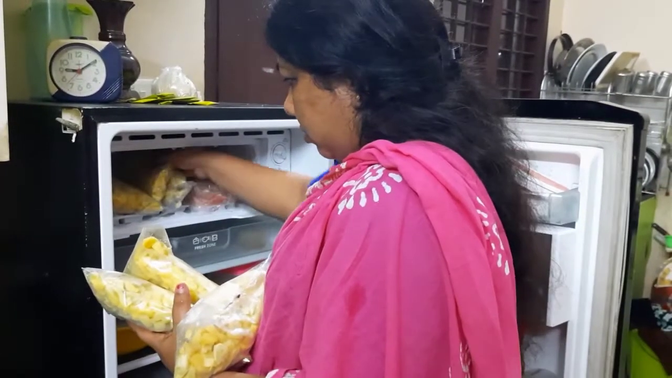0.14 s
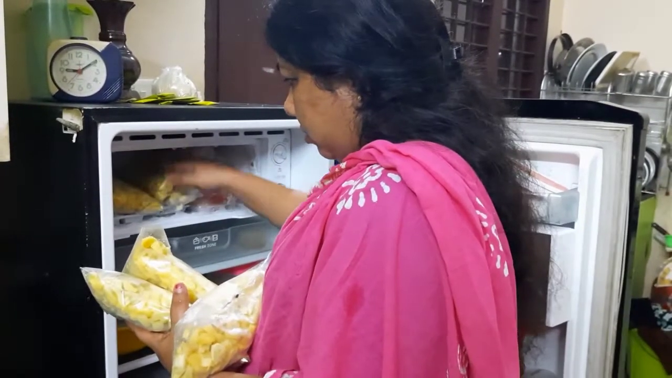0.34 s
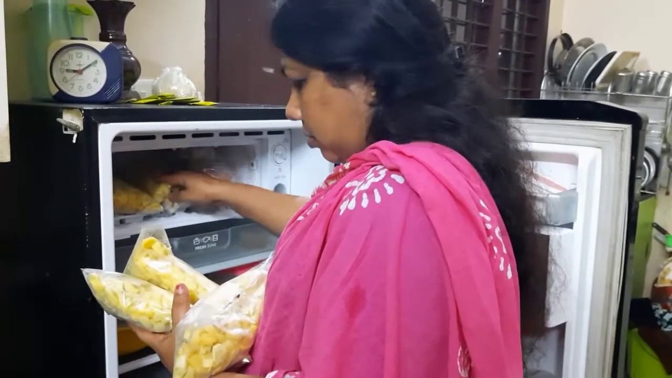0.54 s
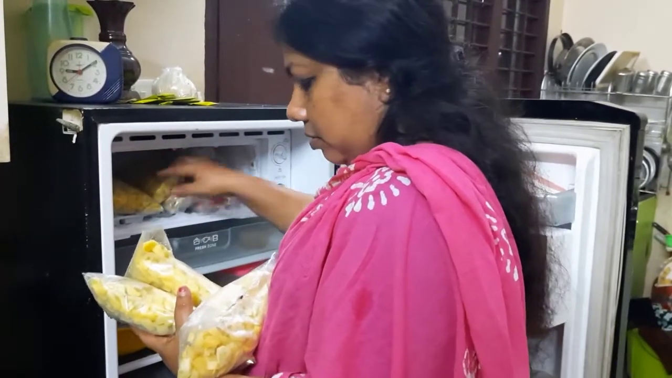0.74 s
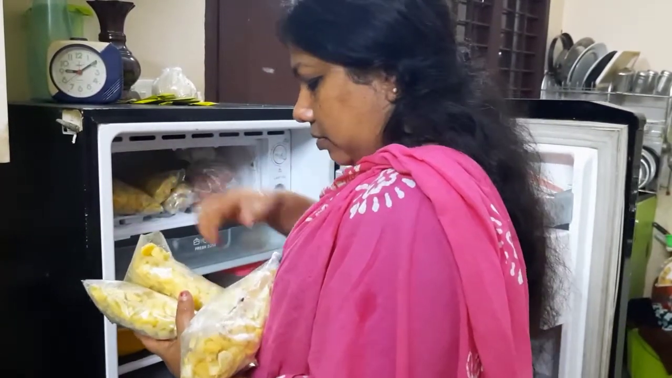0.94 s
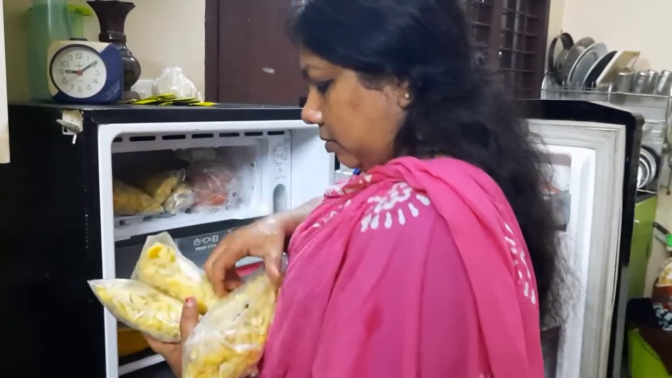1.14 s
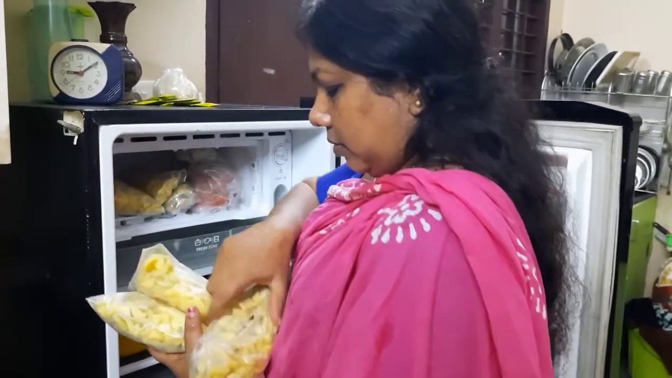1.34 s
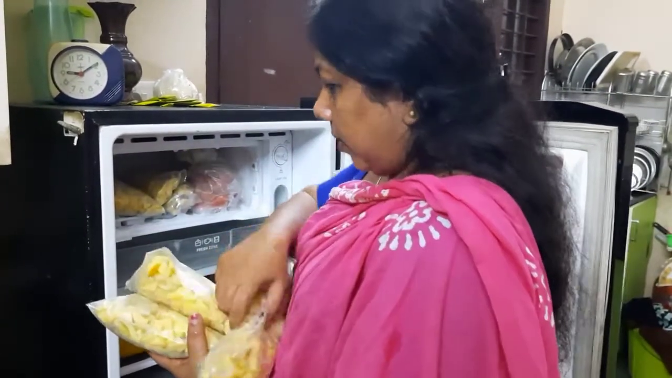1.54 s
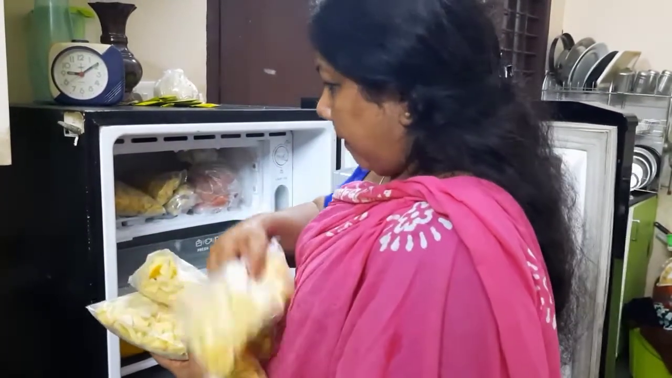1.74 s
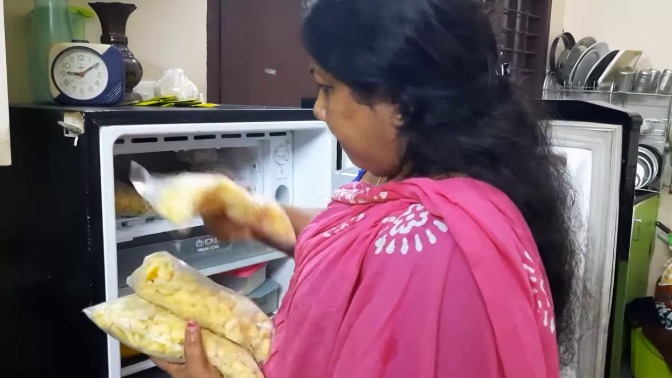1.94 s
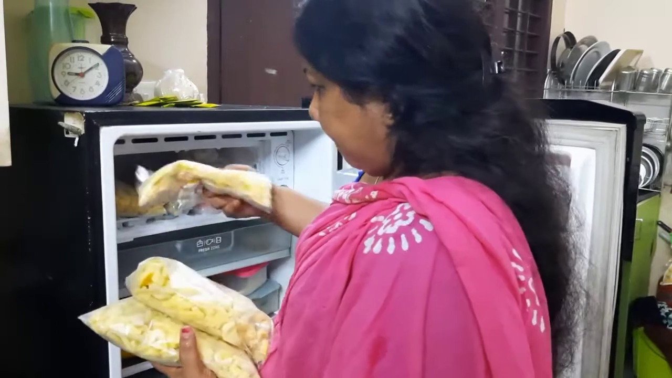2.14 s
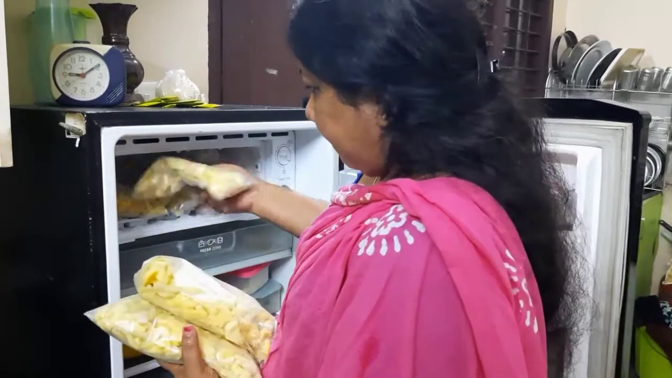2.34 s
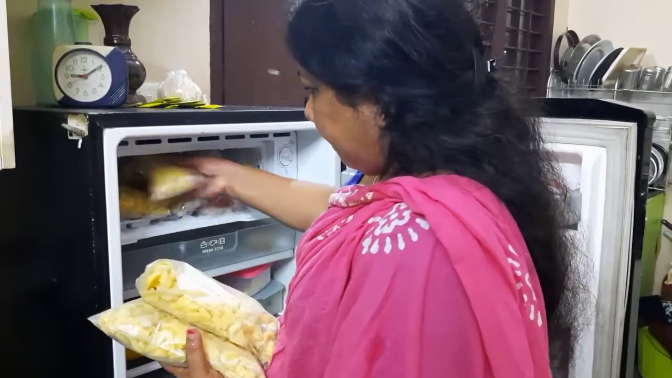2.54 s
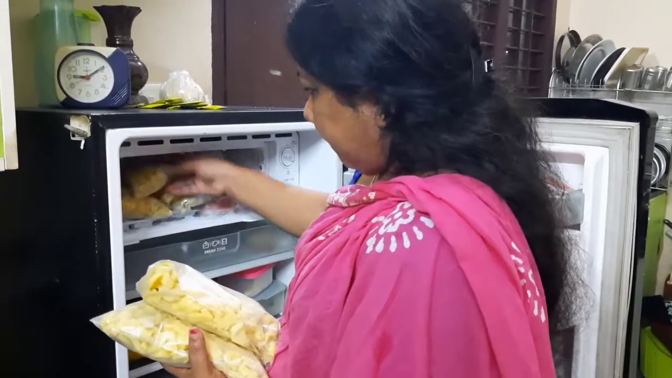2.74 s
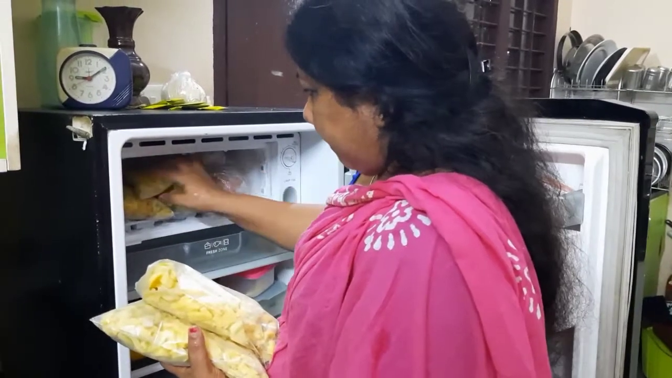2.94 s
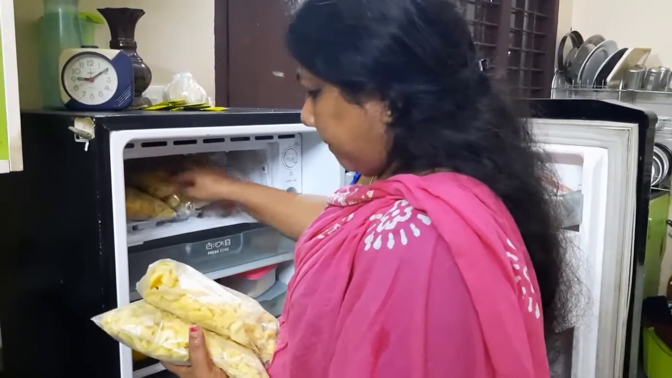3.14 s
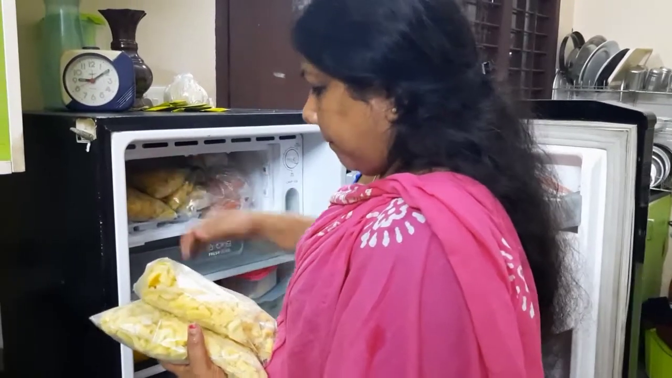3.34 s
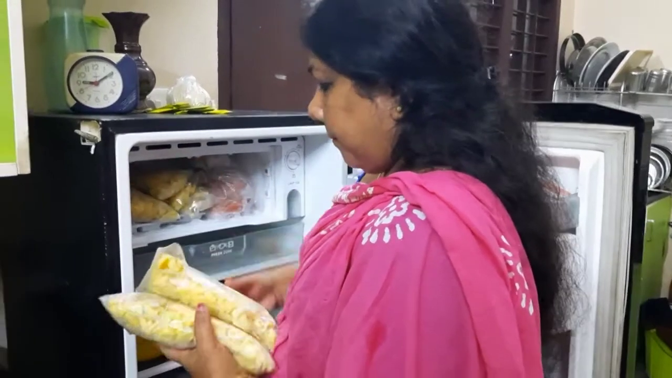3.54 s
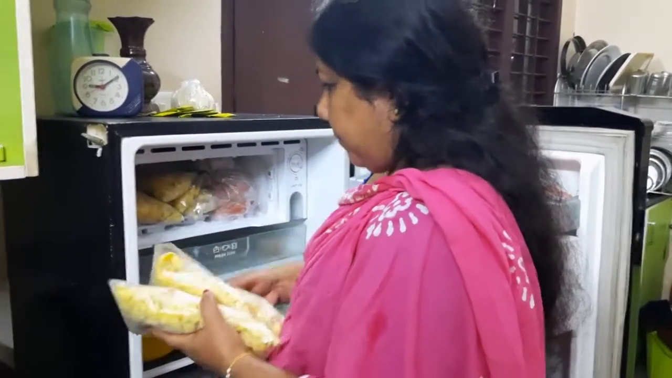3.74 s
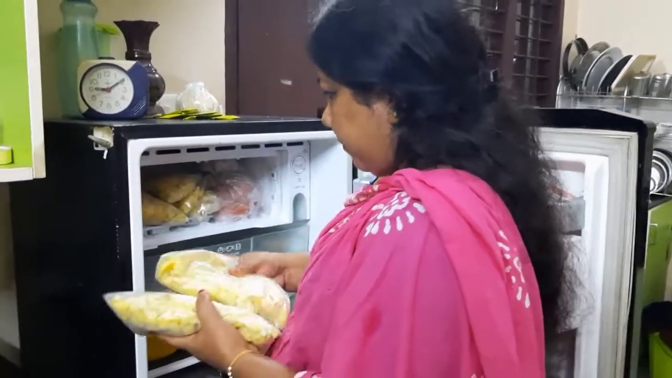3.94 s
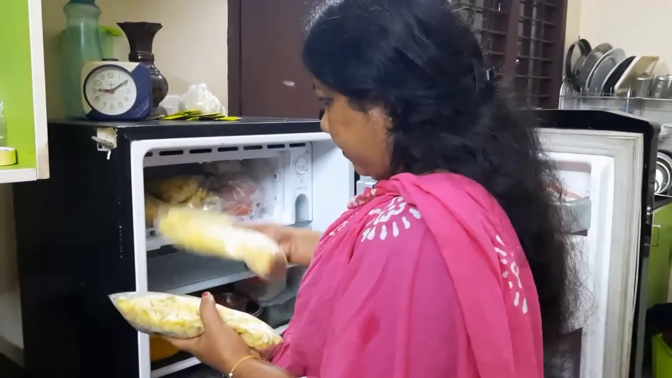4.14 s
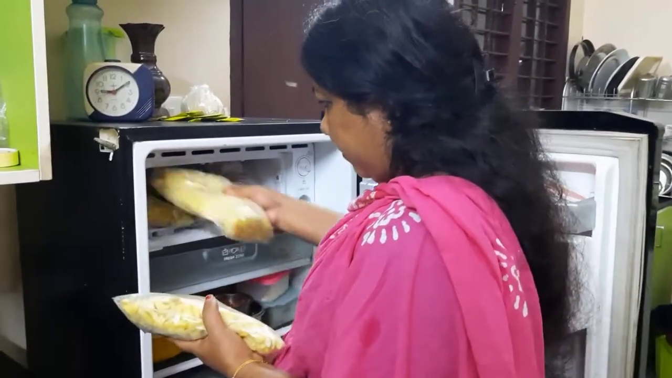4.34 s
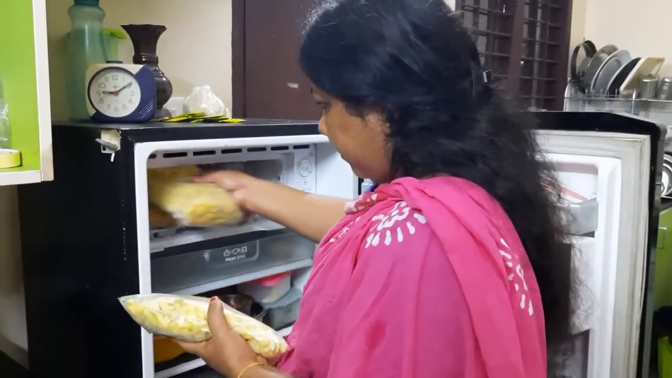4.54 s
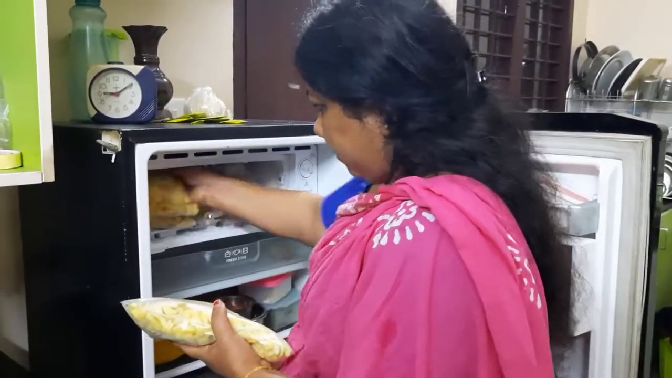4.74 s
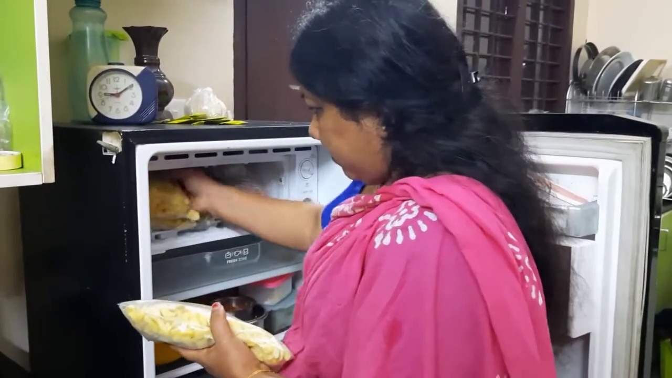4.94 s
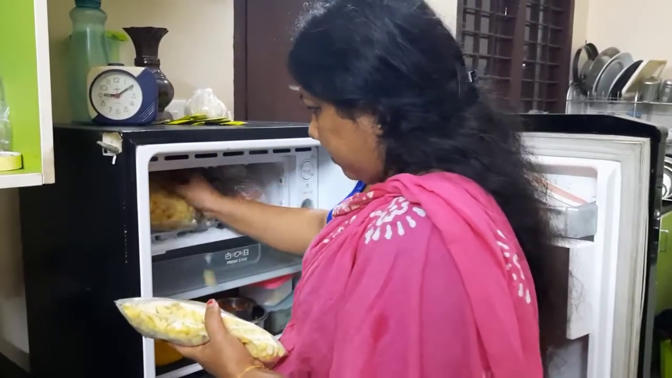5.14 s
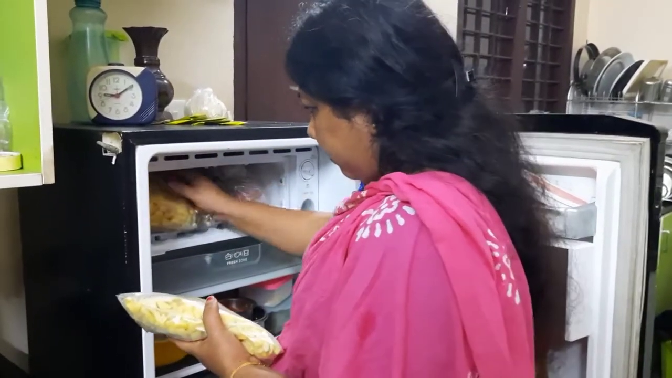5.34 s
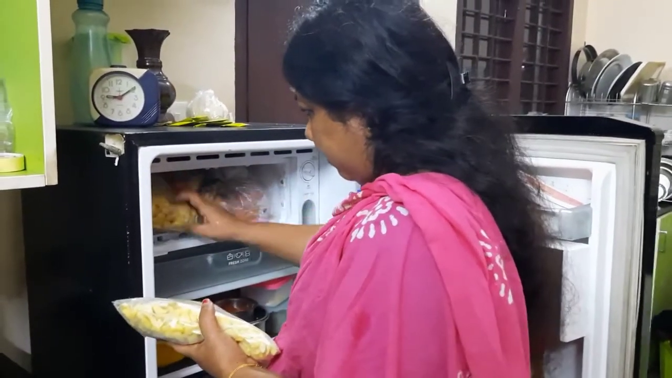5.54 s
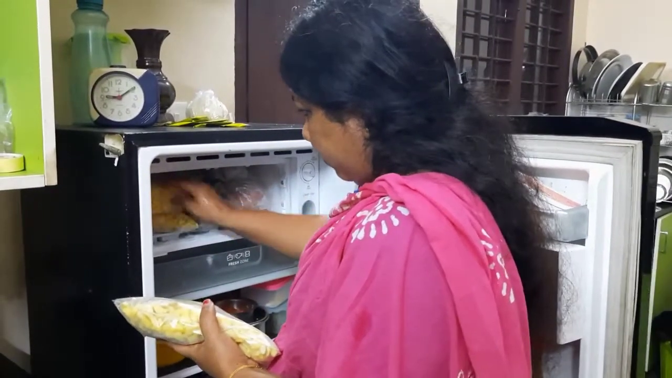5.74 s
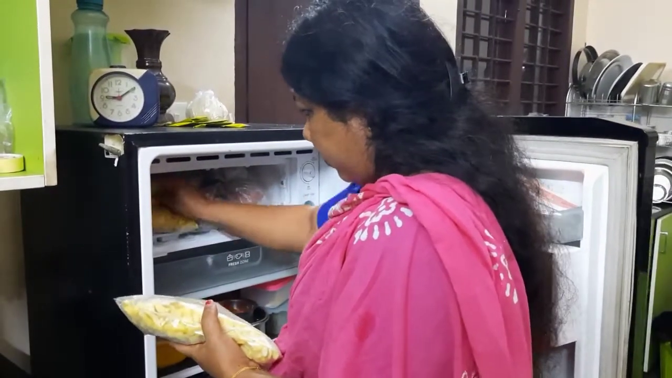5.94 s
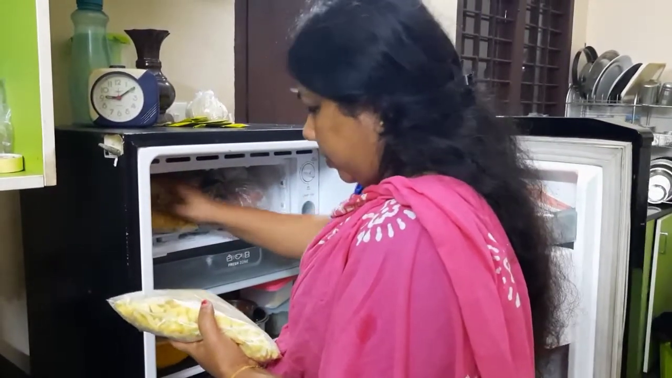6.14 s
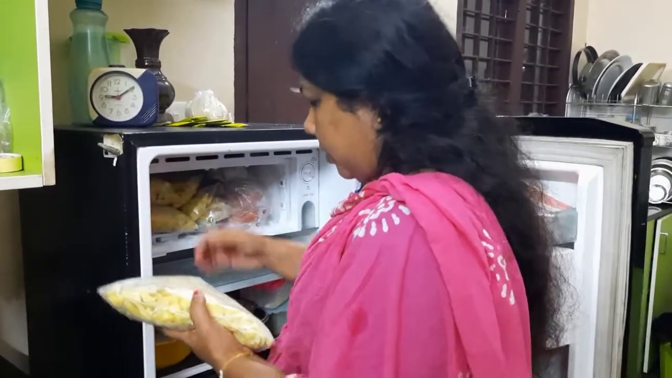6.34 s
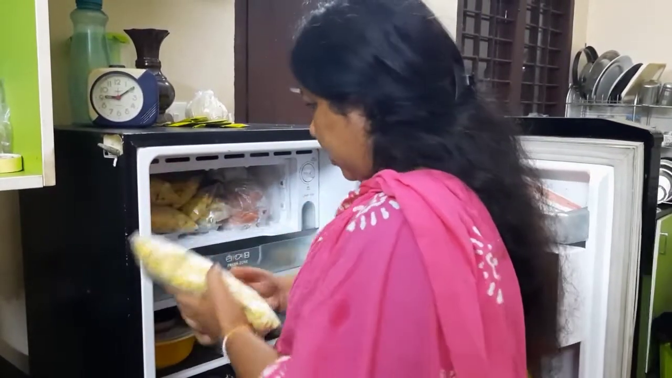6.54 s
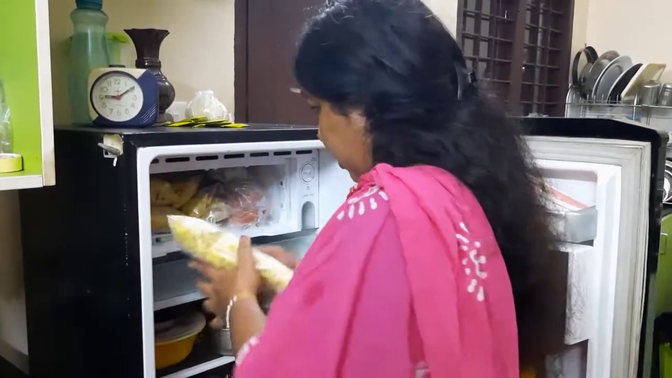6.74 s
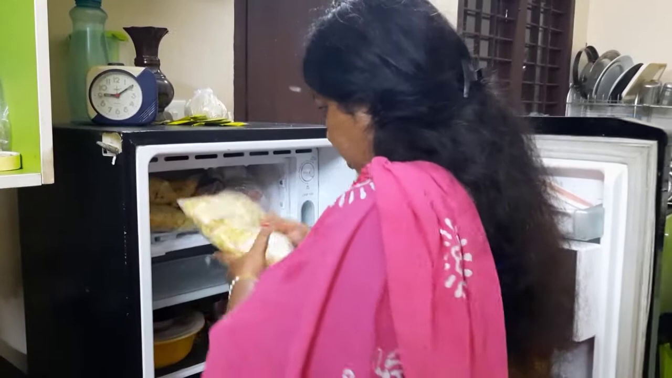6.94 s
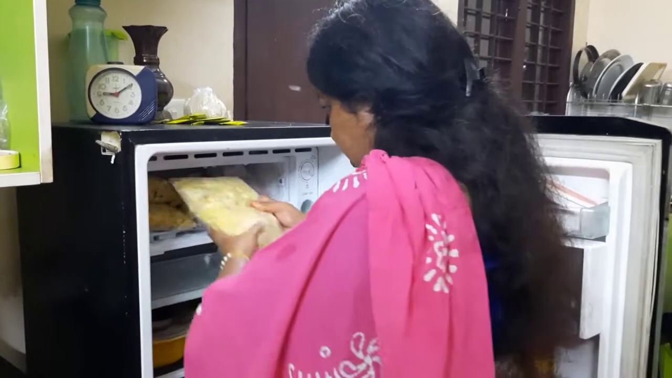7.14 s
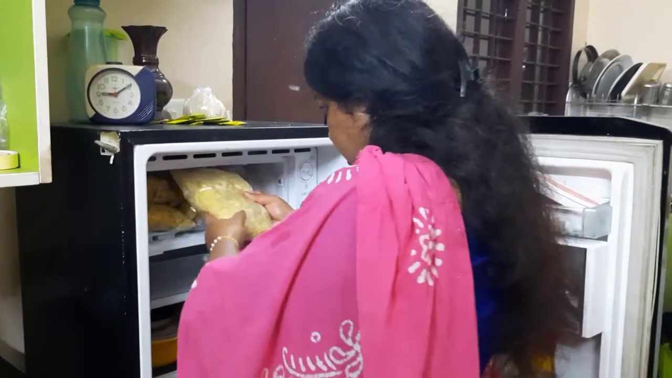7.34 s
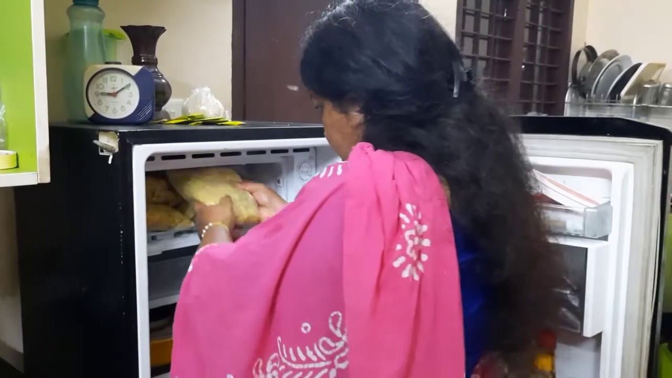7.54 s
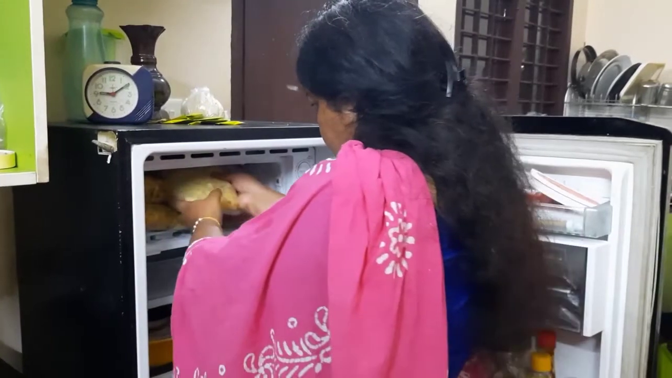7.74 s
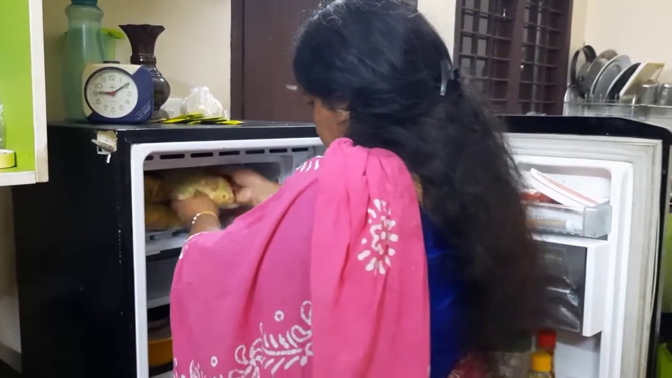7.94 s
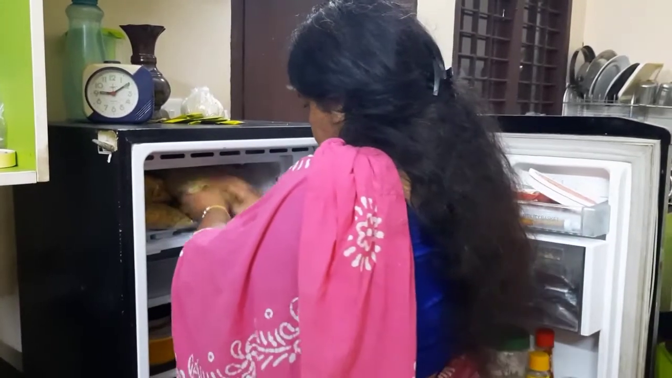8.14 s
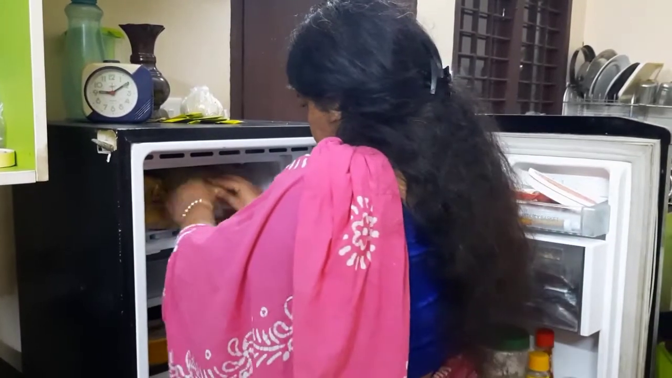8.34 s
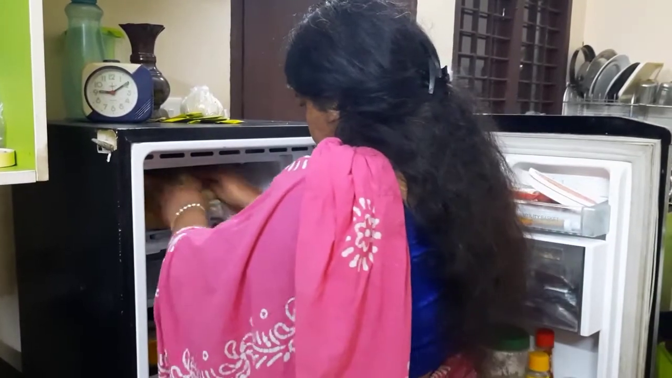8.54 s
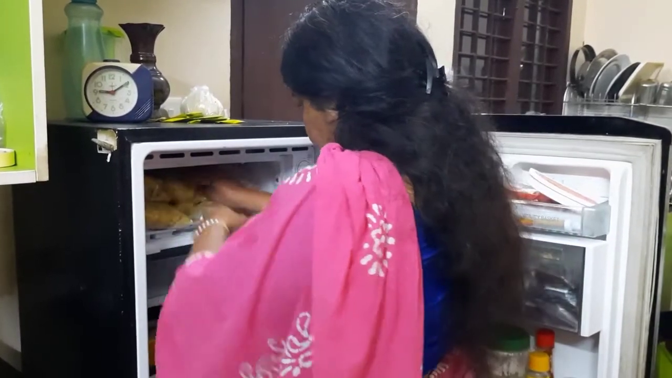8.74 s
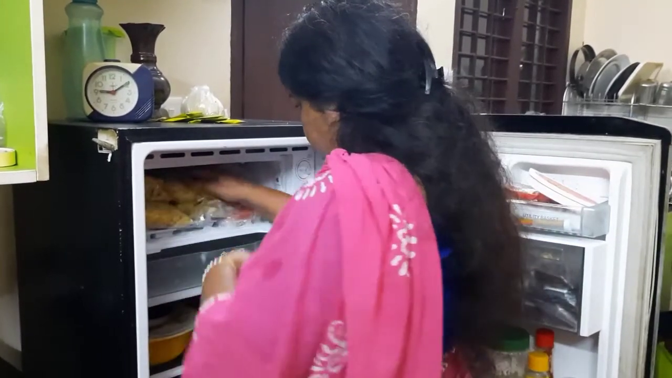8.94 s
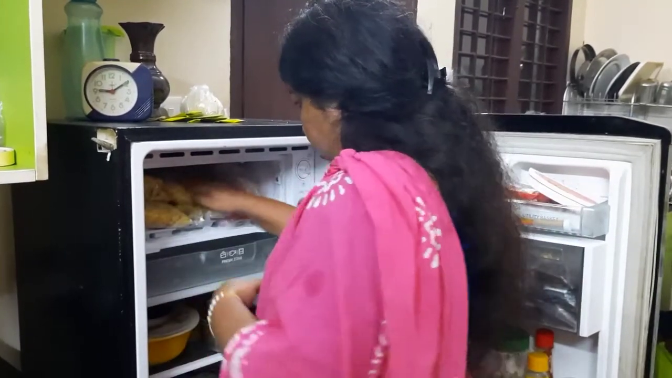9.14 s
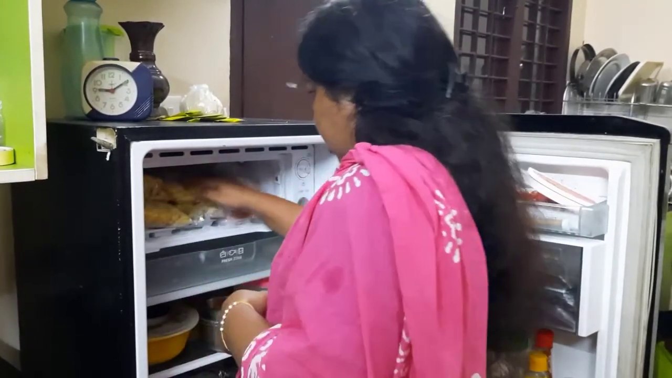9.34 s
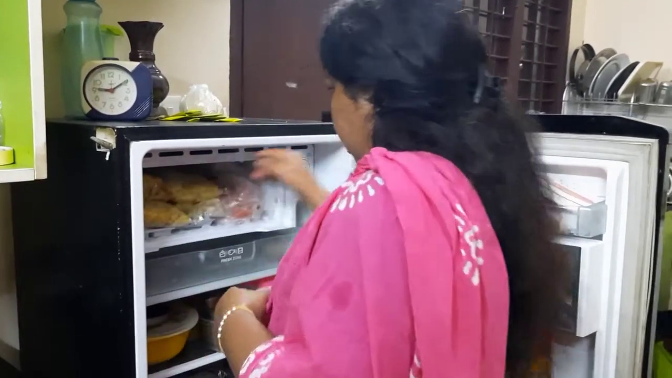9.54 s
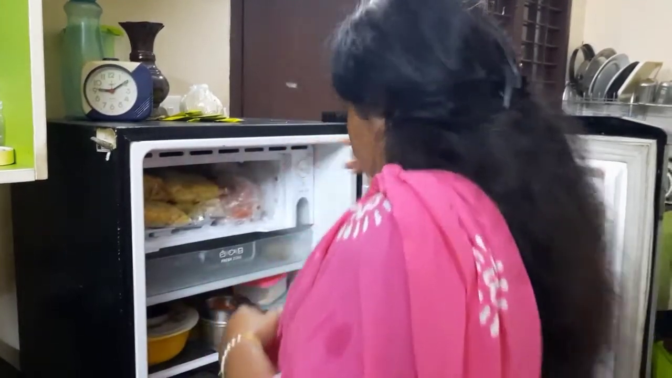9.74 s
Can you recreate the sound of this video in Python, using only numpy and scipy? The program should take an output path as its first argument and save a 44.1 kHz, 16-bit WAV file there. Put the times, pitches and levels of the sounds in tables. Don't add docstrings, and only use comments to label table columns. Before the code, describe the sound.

Crisp plastic crinkling and loud film snaps come and go close by, with frozen lumps knocking a hollow freezer compartment over very faint fridge hiss.

```python
import sys
import numpy as np
from scipy import signal
from scipy.fft import rfft, irfft, next_fast_len
from scipy.io import wavfile
from scipy.ndimage import map_coordinates

SR = 44100
rng = np.random.default_rng(int(sys.argv[2]) if len(sys.argv) > 2 else 0)


def makeup_ratio(level_db):
    decades = np.asarray(level_db, float) / 20
    return 10 ** decades


def file_out(sig):
    cols = np.atleast_2d(sig).T
    lim = np.clip(cols, -1, 1)
    pcm = np.round(lim * 32767).astype(np.int16)
    wavfile.write(sys.argv[1], SR, pcm)


N = 431291
SPOTS = 3

# f/Hz, level/dB
HISS_COLOUR = [(20, -23), (113, -5), (520, -29), (1490, -40), (2700, -15), (3090, 0), (3900, -19),
               (6200, -18), (10000, -8), (15500, -51)]
# f/Hz, width/Hz, level/dB
COOLANT_MODES = [(2050, 370, -5.5), (3120, 330, 0.5), (5270, 260, -1), (7150, 1000, -1.5),
                 (9700, 360, -5.5)]
HISS_DB = -62.5

# f/Hz, density/dB per Hz
FILM_COLOUR = [(2000, -35), (3500, 0), (4700, 0.5), (6000, 0), (8600, 2), (12900, -2), (15000, -4.5),
               (15600, -8), (16200, -46)]
# f/Hz, density/dB per Hz
FOLD_COLOUR = [(380, -26), (650, -6), (900, -1), (1360, 0), (1600, -2), (2500, 1), (3100, -3), (4500, -12),
               (8000, -34), (16000, -70)]
# f/Hz, width/Hz, level/dB
SHELF_MODES = [(335.3, 113, -7), (400, 59, -1.5), (469, 73, -1), (557, 140, -4), (795, 460, -9)]
# f/Hz, width/Hz, level/dB
CABINET_MODES = [(63.5, 42, -34), (98, 27, -6), (176, 90, 3)]
# f/Hz, width/Hz, level/dB
BAG_MODES = [(282, 44, -4), (419, 76, 0.5), (603, 170, -3.5), (845, 170, -17)]
# f/Hz, width/Hz, level/dB
AIR_MODES = [(269, 34, 2.5), (300, 99, -5)]

# peak t/s, swell/s, fade/s, film level/dB, folds re film/dB
FILM_SQUEEZES = [(1.16, 0.17, 0.34, -65, 8), (1.41, 0.36, 0.092, -51, 4.5), (1.5, 0.093, 0.046, -41.5, 6),
                 (1.58, 0.088, 0.085, -35, 3), (1.7, 0.08, 0.21, -53.5, 9.5), (1.83, 0.03, 0.08, -52, -13.5),
                 (3.54, 0.034, 0.22, -66, 10.5), (3.719, 0.049, 0.072, -35.5, -1.5),
                 (3.825, 0.23, 0.17, -36.5, -2.5), (3.963, 0.16, 0.09, -37.5, -2),
                 (4.048, 0.054, 0.081, -43, -1.5), (6.388, 0.014, 0.1, -45.5, -1),
                 (6.505, 0.01, 0.19, -41, -2), (6.56, 0.011, 0.2, -37, -3), (6.63, 0.066, 0.35, -34, -6.5),
                 (7.331, 0.008, 0.15, -53.5, -5), (6.775, 0.27, 0.092, -33.5, -2),
                 (6.87, 0.1, 0.082, -43, -1), (6.972, 0.12, 0.012, -40, -5),
                 (7.258, 0.19, 0.044, -52, -12.3), (7.441, 0.13, 0.019, -42.5, -9),
                 (9.131, 0.093, 0.28, -51, -3), (9.369, 0.25, 0.052, -56.5, 2.5),
                 (9.49, 0.031, 0.051, -64.5, 11), (9.58, 0.11, 0.14, -58, -18),
                 (0.01, 0.064, 0.07, -37.5, -3.5), (0.22, 0.97, 0.76, -51, -2),
                (0.44, 0.064, 0.16, -38.5, -1.5), (0.561, 0.08, 0.056, -41.5, -5),
                (0.697, 0.11, 0.095, -45, -2), (2.46, 0.013, 0.55, -45, -1.5),
                (2.569, 0.08, 0.32, -39, 0.8), (2.77, 0.72, 0.088, -41, -4),
                (3.112, 0.13, 0.083, -37, -0.2), (4.503, 0.069, 0.17, -37.5, -1.5),
                (4.598, 0.008, 0.055, -38.5, 4), (4.736, 0.089, 0.13, -28, -2.5),
                (4.974, 0.49, 0.19, -40, -1.5), (5.33, 0.45, 0.047, -47.5, 0),
                (5.558, 0.048, 0.053, -50, 6), (5.648, 0.084, 0.16, -35, -5),
                (5.741, 0.075, 0.39, -34, -2.5), (5.953, 0.69, 0.17, -43, 4.5),
                (7.758, 0.41, 0.78, -40.5, 0.2), (8.007, 0.054, 0.096, -44, 3),
                (8.297, 0.08, 0.17, -39.7, -7), (8.2, 0.14, 0.26, -50, -3), (8.379, 0.075, 0.044, -44, -5),
                (8.635, 0.39, 0.35, -39.5, -0.5), (8.74, 0.077, 0.035, -43.5, 3.5)]
# peak t/s, swell/s, fade/s, bump level/dB, cabinet thuds re bumps/dB
WEIGHT_SHIFTS = [(0.05, 0.43, 0.28, -51.5, -14), (0.3, 0.39, 0.044, -54, -17),
                 (0.439, 0.042, 0.23, -50.4, -9), (0.691, 0.078, 0.12, -54, -22.5),
                 (2.459, 0.0074, 0.58, -46.5, -27), (2.561, 0.053, 0.61, -43, -7.5),
                 (2.791, 0.24, 0.056, -43.5, -8), (3.144, 0.33, 0.093, -43, -10),
                 (4.516, 0.067, 0.98, -43.5, -8), (4.73, 0.061, 0.13, -36.5, -14),
                 (4.97, 0.22, 0.31, -43, -26), (5.15, 0.12, 0.16, -55, 7.5),
                 (5.506, 0.0067, 0.28, -31.5, -18), (5.6, 0.034, 0.088, -37, -25),
                 (5.72, 0.13, 0.12, -46, -19), (5.883, 0.19, 0.24, -34.5, -29),
                 (6.137, 0.62, 0.044, -48.5, -10.5), (7.796, 0.29, 0.4, -40, -11),
                 (8.15, 0.16, 0.41, -49.5, -9.5), (8.38, 0.28, 0.48, -49, -15),
                 (8.639, 0.12, 0.17, -37, -9), (9.093, 0.18, 0.34, -52, -5),
                 (9.27, 0.073, 0.22, -62.5, -10), (9.53, 0.079, 0.16, -52, -14)]
# peak t/s, swell/s, fade/s, rattle level/dB, thuds re rattle/dB
KERNEL_JOSTLES = [(1.15, 0.13, 0.15, -62, -7), (1.42, 0.25, 0.26, -49, -29),
                  (1.576, 0.22, 0.14, -41.5, -20), (2.2, 0.56, 0.33, -69.5, -13),
                  (3.55, .05, 0.13, -67, -15), (3.76, 0.14, 0.22, -45.5, -13.5),
                  (3.96, 0.26, 0.18, -40, -25), (6.404, 0.13, 0.062, -51, -30), (6.6, 0.11, 0.16, -53, -32),
                  (6.762, 0.28, 0.16, -41, -25), (6.97, 0.14, 0.12, -52, -26.5),
                  (7.411, 0.097, 0.092, -53, -12)]
# t/s, air re shelf/dB
BUMP_DEPTH = [(0, -2), (0.7, -4.5), (2.46, -6), (2.55, 1), (2.85, 3), (3.15, 5), (4.5, -5.5), (4.75, -4),
              (5.1, -4), (5.5, -5), (5.62, 4.5), (5.7, -1), (5.95, 0.5), (7.8, -5), (8.3, -5.5),
              (8.65, 2.5), (9.1, 4.5), (9.6, 6.5)]
SWING_DB = 20

# t/s, peak level/dB, left-right/dB
CRISP_BUCKLES = [(0.0461, -23, -12), (0.2885, -34, 1), (0.4973, -37, -5), (0.873, -41, -16),
                 (1.245, -41, 5), (1.377, -32.5, 21), (1.404, -24.5, 2), (1.524, -27.5, 1),
                 (1.5448, -22, 2), (1.682, -24, -7), (1.8438, -35.5, -14), (2.2693, -19, 2),
                 (2.5214, -29, 2), (2.726, -24.5, 0), (3.0512, -29.5, -4), (3.6957, -28, -1),
                 (3.7912, -30, 3), (3.9619, -19, -4), (4.3612, -35, -6), (4.7077, -24, 5), (4.9545, -25, 0),
                 (5.654, -31, 5), (5.758, -20.5, 2), (6.501, -33, 1), (6.6191, -20, -5),
                 (7.1703, -40.5, 21), (7.328, -37, 2.5), (8.208, -29, -0.5), (8.3819, -23.5, -6),
                 (9.375, -39, 9)]
# t/s, peak level/dB, left-right/dB
MIDDLING_BUCKLES = [(0.679, -40, 3), (1.27, -37, 13), (2.465, -45, 12), (2.613, -32, -2), (2.773, -44, -1),
                    (3.1794, -33, -3), (3.7299, -27.5, 7), (3.848, -30, 10), (3.934, -28, 11),
                    (4.0343, -35, -6), (4.593, -19.5, -7), (4.667, -40, -1), (4.697, -35, -0.5),
                    (4.973, -34, -3), (5.058, -30.5, -3), (5.0998, -23.5, -1), (5.22, -35, 3),
                    (6.01, -37, 10), (6.231, -41, 6), (6.3835, -39, 0), (6.71, -25, 3), (7.637, -32, -2),
                    (7.807, -29.5, -2), (7.826, -34, 8), (8.01, -28, -3), (8.285, -25.5, 0.5),
                    (8.438, -32, -1), (8.744, -35, -20), (9.131, -42, -23), (9.334, -43, 0)]
# t/s, peak level/dB, left-right/dB
PAPERY_BUCKLES = [(0.2036, -36, -3), (0.402, -35, 3), (0.551, -30.5, 3), (0.6884, -34.5, -2),
                  (1.168, -39.5, 5), (1.3092, -33, 2), (1.435, -24.5, 2), (1.476, -24.5, -3),
                  (1.5739, -19, 6), (1.604, -31, -7), (1.707, -41, -4.0), (1.745, -33.5, 13),
                  (1.8239, -30.5, -5), (2.2456, -43, 3.0), (2.457, -32.5, -1), (2.569, -35, 2),
                  (2.9808, -34, 2), (3.1306, -29.5, -6), (3.5263, -43, 12), (3.647, -36.5, 10),
                  (3.8158, -20, 3), (4.047, -27, 9), (4.4942, -27.5, -2), (4.7176, -24, 4),
                  (5.739, -26.5, -3), (6.112, -27.5, -4), (6.951, -24, -1.0), (7.699, -30, 5),
                  (9.0803, -32, -1), (9.1621, -31.5, 0), (1.397, -30, 4), (1.413, -44, 0), (1.529, -25, 2),
                  (1.601, -25, -2), (1.613, -34, -2), (4.536, -33, 2), (4.641, -36, 0), (4.797, -36, 4),
                  (5.842, -37, 0), (5.886, -34, 3), (5.933, -38, 0), (8.296, -30, 2), (9.682, -59, 3),
                  (1.1404, -49, 3), (1.7092, -31, 0), (7.57, -36, 1), (5.1055, -26, 1), (2.274, -32.5, 2),
                  (8.378, -29.5, -1), (8.39, -36, 2)]
CRISP_FOLDS_DB, MIDDLING_FOLDS_DB, PAPERY_FOLDS_DB = -24.5, -7, -6
ROOM_DB, USUAL_DB, NEARER_DB_PER_DB = 18, -29, 0.22

# t/s, peak level/dB, hollow re peak/dB
BAG_KNOCKS = [(0.977, -65, -22), (1.031, -42, -32.5), (1.139, -35, -28), (1.205, -38.5, -39),
              (1.5, -25.5, -22), (1.919, -46, -23), (2.041, -68, -20), (2.182, -62, -22), (1.943, -55, -22),
              (2.459, -33, -18), (2.467, -40, -17), (3.492, -57, -33), (4.468, -35, -17), (5.502, -77, 7),
              (5.515, -35, 0), (5.538, -56, 8), (5.626, -42.5, -1), (6.23, -63, -21), (7.569, -39.5, -14),
              (8.63, -51, -13), (9.174, -35, -13.5), (8.805, -32.5, -15), (9.479, -46.5, -9),
              (9.61, -47.5, -9)]
# t/s, peak level/dB, f/Hz
LUMP_RINGS = [(0.977, -58, 1006), (1.273, -39, 1000), (1.4346, -22.5, 2300), (1.477, -30, 1330),
              (1.497, -24, 1400), (1.708, -30, 1250), (1.7472, -26, 2550), (1.8234, -32, 2270),
              (1.919, -41.5, 960), (1.944, -50, 980), (2.181, -46, 2030), (2.245, -41, 2240),
              (2.467, -32, 490), (2.535, -30, 263), (2.98, -38, 842), (3.05, -42, 850), (3.11, -32, 282),
              (3.495, -48, 2500), (3.522, -38, 3080), (3.564, -37, 2610), (4.4947, -35, 2580),
              (4.593, -20, 1390), (4.8953, -34, 2480), (5.059, -30.5, 1090), (5.3293, -41, 2980),
              (5.501, -36, 400), (5.517, -16, 447), (5.543, -22, 400), (5.584, -28, 335),
              (5.596, -21.5, 340), (5.626, -31.5, 455), (5.842, -27, 492), (5.933, -28, 506),
              (6.0091, -28, 2340), (6.0731, -36, 1570), (6.3385, -46, 1190), (6.5565, -27, 2500),
              (6.6183, -22, 3000), (7.41, -34, 3560), (7.5697, -36, 980), (7.78, -32, 480),
              (7.81, -36, 450), (8.01, -31.5, 1500), (8.297, -30.5, 2740), (8.635, -31, 300),
              (8.712, -31, 300), (8.745, -32, 1440), (8.9271, -47, 2220), (9.172, -34.5, 1060),
              (9.333, -56, 1200), (9.61, -49, 500), (9.682, -51, 2500), (4.361, -38, 2830),
              (6.3853, -36, 2290), (6.009, -24, 4500), (2.27, -21, 4200), (1.1403, -40, 2640),
              (3.695, -28, 2640), (5.149, -31, 159), (5.177, -32, 148)]
RING_CYCLES, RING_ROOM_DB, RING_LOW_HZ = 1.24, -1.5, 190

# f/Hz, t60/s
KITCHEN_T60 = [(250, 0.28), (900, 0.37), (2500, 0.44), (6000, 0.4), (15000, 0.4)]
# f/Hz, correlation
LIKENESS = [(30, 0.3), (70, 0.66), (180, 0.86), (330, 0.77), (550, 0.41), (1650, 0), (4970, 0.088),
            (15000, 0)]
# f/Hz, left-right/dB
MIC_LEAN = [(60, -2.5), (240, -1), (950, 0.5), (3770, 1.5), (15000, -3)]


def unit(x):
    return x / np.sqrt(np.mean(np.abs(x) ** 2) + 1e-20)


def along(points, hz):
    f, v = np.transpose(points)
    return np.interp(np.log(hz + 1), np.log(f + 1), v)


def causal(points, hz):
    cepstrum = irfft(np.log(makeup_ratio(along(points, hz)) + 1e-4))
    cepstrum[1:len(hz)] *= 2
    cepstrum[len(hz):] = 0
    return unit(np.exp(rfft(cepstrum)))


def resonances(modes, hz):
    total = 0
    for k, (centre, width, db) in enumerate(modes):
        damping = 1j * hz * width
        total = total + (-1) ** k * makeup_ratio(db) * damping / (centre * centre - hz * hz + damping)
    return unit(total)


def coloured(layers, colours, m):
    return sum(rfft(x, m) * colour for x, colour in zip(layers, colours))


def pair(a, b, hz):
    turn = np.arccos(np.clip(along(LIKENESS, hz), -1, 1)) / 2
    shared, apart = np.cos(turn) * a, np.sin(turn) * b
    return np.array([shared + apart, shared - apart])


def bursts(strength, life_s):
    keep = np.exp(-1 / (life_s * SR))
    return signal.lfilter([1], [1, -keep], strength) * rng.standard_normal(strength.shape)


def fridge(m, hz):
    jets = unit(np.abs(resonances(COOLANT_MODES, hz)) ** 2)
    colour = unit(makeup_ratio(along(HISS_COLOUR, hz))) + makeup_ratio(2.0) * jets
    a, b = rfft(rng.standard_normal((2, N)), m) * colour
    drift = map_coordinates(rng.standard_normal(80), [np.arange(N) * 7 / SR])
    return makeup_ratio(HISS_DB + 1.0 + 0.21 * drift) * unit(irfft(pair(a, b, hz), m)[:, :N])


def swarm(count, spread_db, colour_db, clump_db, life_s):
    when, where, chance = rng.random((count, 3)).T
    clumps = map_coordinates(rng.standard_normal(400), [when * 390])
    size_db = -spread_db * np.log(1 - chance).clip(-3.3, 0) + clump_db * clumps
    vary_db = colour_db * rng.standard_normal((count, len(life_s))).T.clip(-3, 1.6)
    slot = (where * SPOTS).astype(int) * N + (when * N).astype(int)
    layers = []
    for gain, life in zip(makeup_ratio(size_db + vary_db), life_s):
        spikes = np.bincount(slot, gain, SPOTS * N).reshape(SPOTS, N)
        layers.append(unit(bursts(spikes, life)) / np.sqrt(SPOTS))
    return layers


def strokes(rows):
    t, power = np.arange(0, N + 32, 32) / SR, 0
    for s, swell_s, fade_s, db, second_db in rows:
        away = np.maximum((s - t) / swell_s, (t - s) / fade_s)
        power = power + makeup_ratio([[db], [db + second_db]]) ** 2 * makeup_ratio(-2 * SWING_DB * away)
    return [np.interp(np.arange(N) / SR, t, np.sqrt(p)) for p in power]


def crackle():
    film = swarm(count=6000, spread_db=4.3, colour_db=4, clump_db=1.1, life_s=[.0003, .0005])
    kernels = swarm(count=12000, spread_db=2, colour_db=2.5, clump_db=.4, life_s=[.0015, .003, .001])
    grains = film + kernels + kernels[:1]
    bumps, thuds = strokes(WEIGHT_SHIFTS)
    rattle, pats = strokes(KERNEL_JOSTLES)
    deep_db = np.interp(np.arange(N) / SR, *np.transpose(BUMP_DEPTH))
    effort = strokes(FILM_SQUEEZES)
    effort += [bumps * makeup_ratio(-deep_db / 2), np.hypot(thuds, pats), rattle, bumps * makeup_ratio(deep_db / 2)]
    trim_db = [-0.88, 0.77, -0.73, 0.7, -0.036, -3.1]
    return np.array([makeup_ratio(db) * e * g for db, e, g in zip(trim_db, effort, grains)])


def blows(s, size_db, pan_db, room_db, life_s, channels):
    at = np.round((s + .0006) * SR).astype(int)
    spot = np.arange(len(s)) % SPOTS
    spikes = np.zeros((len(size_db), channels, N))
    spikes[:, :, at] = makeup_ratio(size_db)[:, None] * makeup_ratio(np.outer([.5, -.5], pan_db))[:channels]
    kicks = np.zeros((len(size_db), SPOTS, N))
    kicks[:, spot, at] = makeup_ratio(size_db + room_db)
    edge = .8
    return np.array([edge * x + bursts(x, life) for x, life in zip(spikes, life_s)]), kicks


def snaps():
    kinds = [CRISP_BUCKLES, MIDDLING_BUCKLES, PAPERY_BUCKLES]
    s, db, pan_db = np.transpose(CRISP_BUCKLES + MIDDLING_BUCKLES + PAPERY_BUCKLES)
    folds_db = np.repeat([CRISP_FOLDS_DB, MIDDLING_FOLDS_DB, PAPERY_FOLDS_DB], [len(k) for k in kinds])
    room_db = ROOM_DB - NEARER_DB_PER_DB * (db - USUAL_DB)
    size_db = np.array([db - 2.0, db + folds_db + 1.0])
    return blows(s, size_db, pan_db, room_db, life_s=[.0009, .0014], channels=2)


def knocks():
    s, db, hollow_db = np.transpose(BAG_KNOCKS)
    size_db = np.array([db - 7.5, db + hollow_db + 5.0])
    return blows(s, size_db, pan_db=0 * s, room_db=21.0, life_s=[.002, .005], channels=1)


def rings():
    out, t = np.zeros(N + SR), np.arange(SR // 20) / SR
    for s, db, hz in LUMP_RINGS:
        u = t * hz / RING_CYCLES
        swell = u * np.exp(1 - u)
        out[round(s * SR):][:len(t)] += makeup_ratio(db - 3.0) * swell * np.sin(2 * np.pi * hz * t)
    return out[:N]


def direct(hz, lag_s, lean_db):
    side = np.array([[.5], [-.5]])
    return makeup_ratio(side * lean_db) * np.exp(-2j * np.pi * hz * side * lag_s)


def tail(m, hz):
    f, t, z = signal.stft(rng.standard_normal((2, SR * 2 // 3)), SR, nperseg=256)
    decay_db = -60 * t / along(KITCHEN_T60, f)[:, None]
    echo = signal.istft(z * makeup_ratio(decay_db), SR, nperseg=256)[1]
    s = np.arange(echo.shape[1]) / SR
    onset = 1 - np.exp(-(s / 0.002) ** 2)
    cluster = 1 + 1.17 * np.exp(-s / 0.0045)
    echo *= onset * cluster
    return pair(*rfft(echo / np.linalg.norm(echo[0]), m), hz)


def scene():
    m = 2 * next_fast_len(N // 2 + SR // 4)
    hz = np.fft.rfftfreq(m, 1 / SR)
    film, folds, cabinet = causal(FILM_COLOUR, hz), causal(FOLD_COLOUR, hz), resonances(CABINET_MODES, hz)
    soft = (1 + (1j * hz / 640) ** 2 + 1.3j * hz / 640) * (1 + 1j * hz / 900)
    hollow = unit(resonances(SHELF_MODES, hz) / soft)
    pack = unit(resonances(BAG_MODES, hz) / (1 + 1j * hz / 710) ** 2)
    air = unit(resonances(AIR_MODES, hz) / (1 + 1j * hz / 400))
    sharp = film * (0.51 + hz / 10500)

    rustle = coloured(crackle(), [film, folds, hollow, cabinet, pack, air], m)
    rips, kicks = snaps()
    thumps, jolts = knocks()
    ringing = rfft(rings(), m) * (1j * hz / (RING_LOW_HZ + 1j * hz)) ** 2

    lags_s, leans_db = [0.00014, -.00008, 0.00007], [-0.46, -.3, 0.61]
    near = makeup_ratio(-6.5) * sum(b * direct(hz, lag, lean) for b, lag, lean in zip(rustle, lags_s, leans_db))
    near += coloured(rips, [sharp, folds], m)
    near += coloured(thumps, [folds, hollow], m)
    near += ringing

    excite = rustle + coloured([kicks[0], kicks[1] + jolts[0], jolts[1]], [film, folds, hollow], m)
    excite[1] += makeup_ratio(RING_ROOM_DB) * ringing
    far = sum(b * tail(m, hz) for b in excite)
    return irfft(near + far, m)[:, :N] + fridge(m, hz)


def top_cut(x):
    return signal.sosfilt(signal.butter(12, 16800, fs=SR, output="sos"), x)


def record(dry):
    m = 2 * next_fast_len(N // 2 + 999)
    hz = np.fft.rfftfreq(m, 1 / SR)
    edge = makeup_ratio(np.interp(hz, [15500, 15800, 16900], [0, -14, -55]))
    colour = edge * makeup_ratio(np.outer([.5, -.5], along(MIC_LEAN, hz)))
    mix = irfft(rfft(dry, m) * colour, m)[:, :N]
    return top_cut(mix)


dry = scene()
out = record(dry)
file_out(out)
```